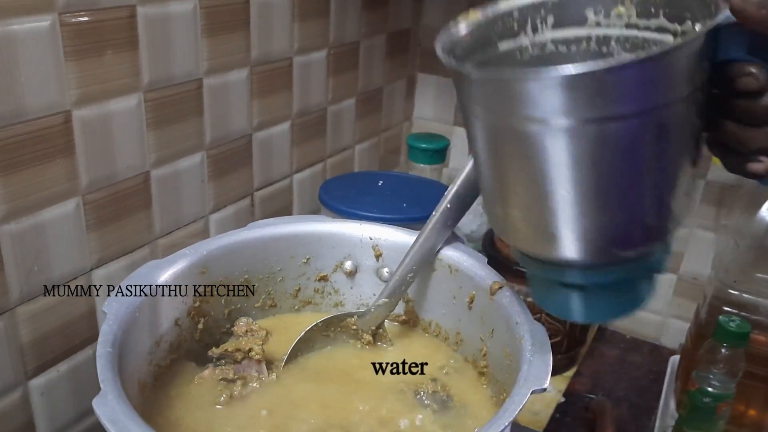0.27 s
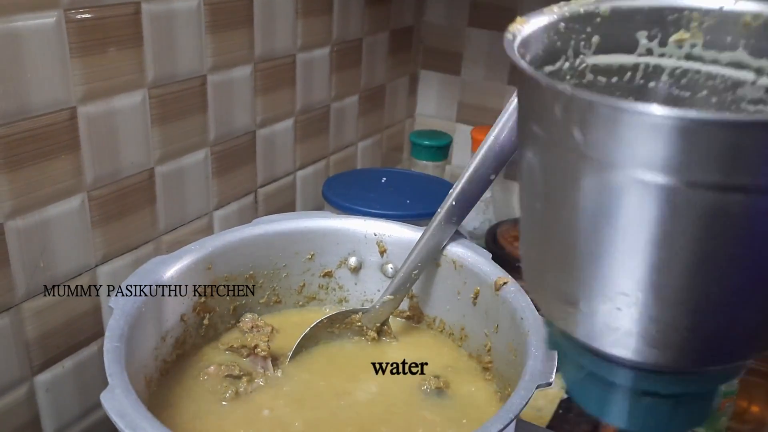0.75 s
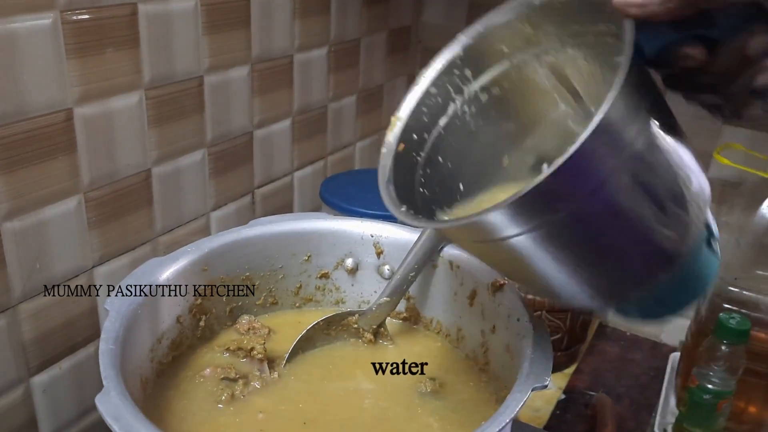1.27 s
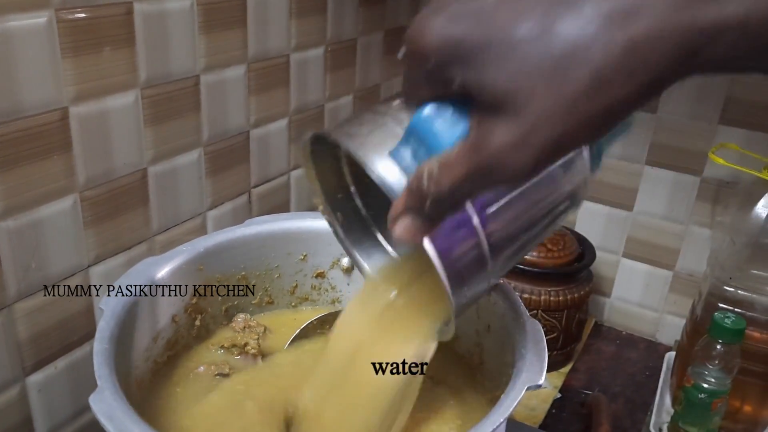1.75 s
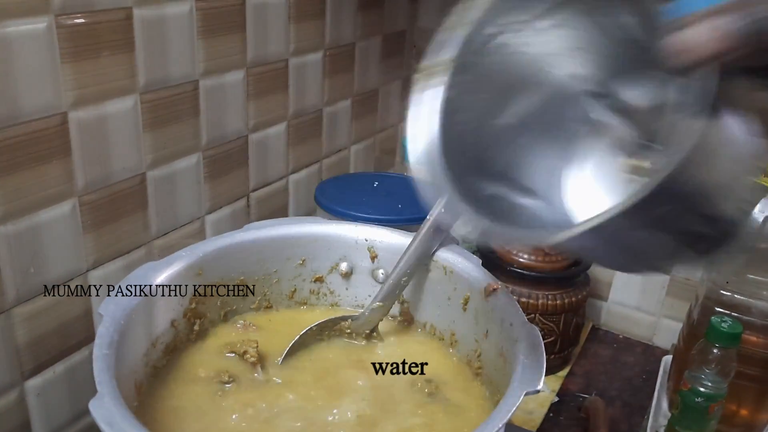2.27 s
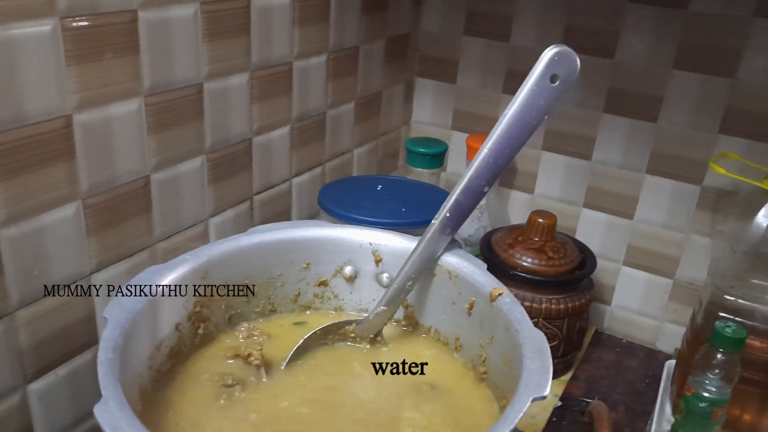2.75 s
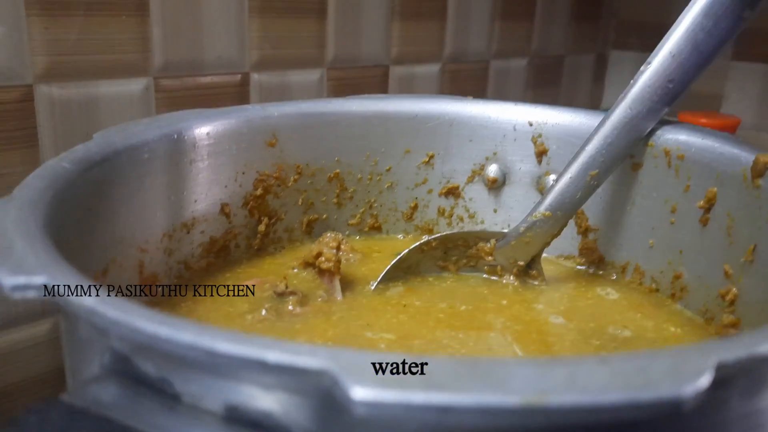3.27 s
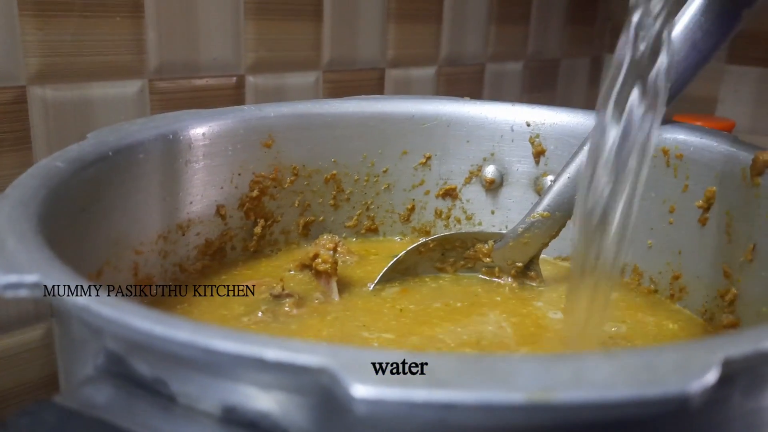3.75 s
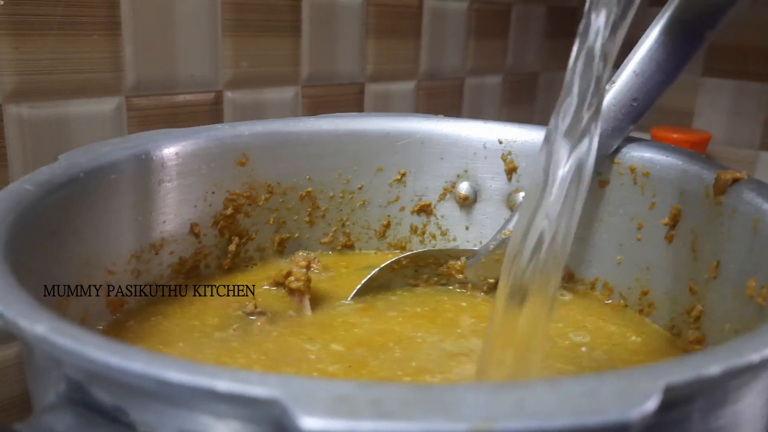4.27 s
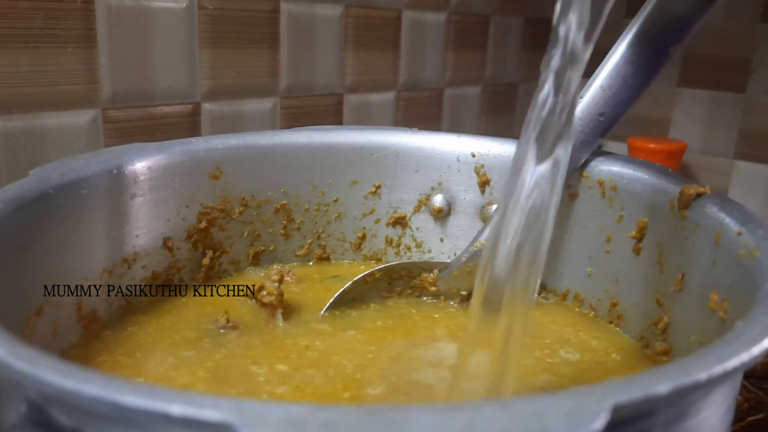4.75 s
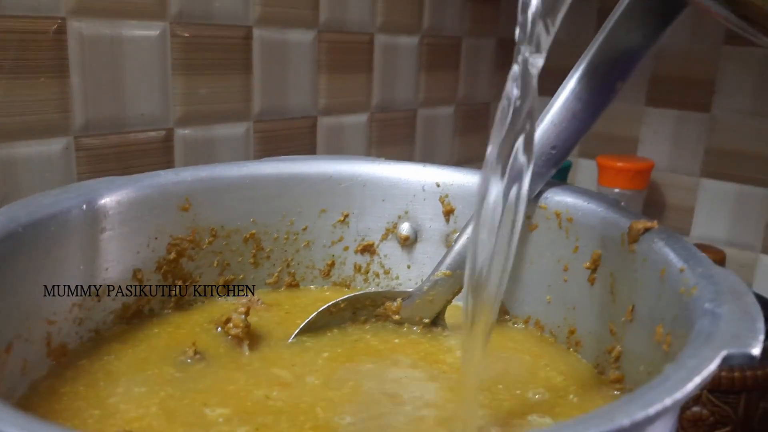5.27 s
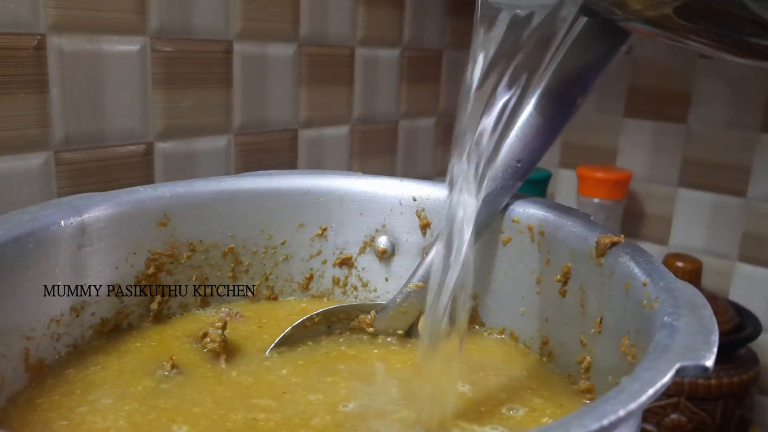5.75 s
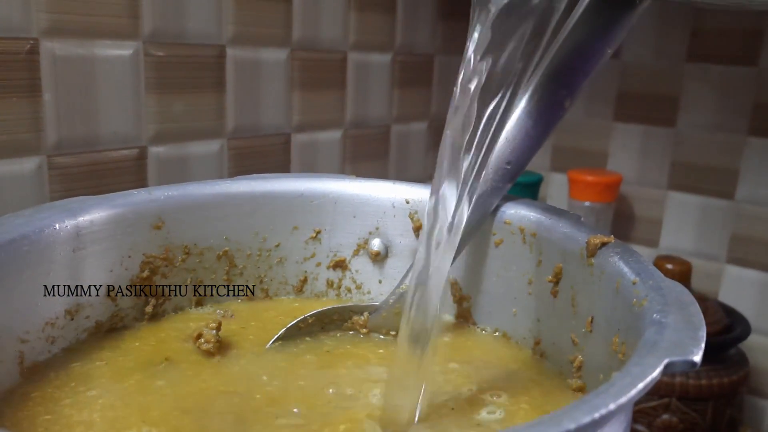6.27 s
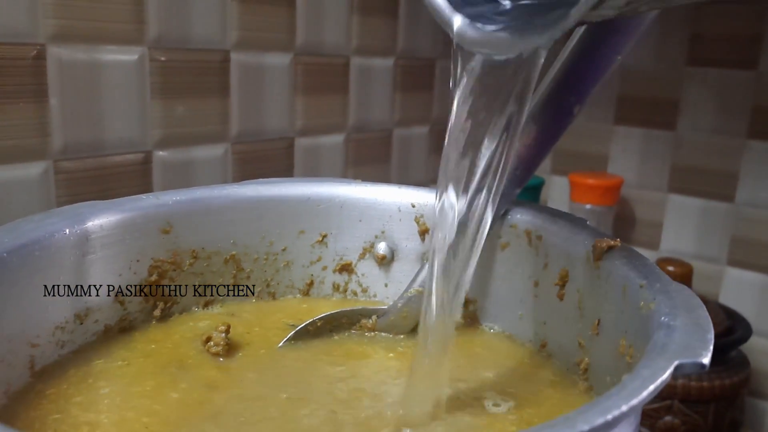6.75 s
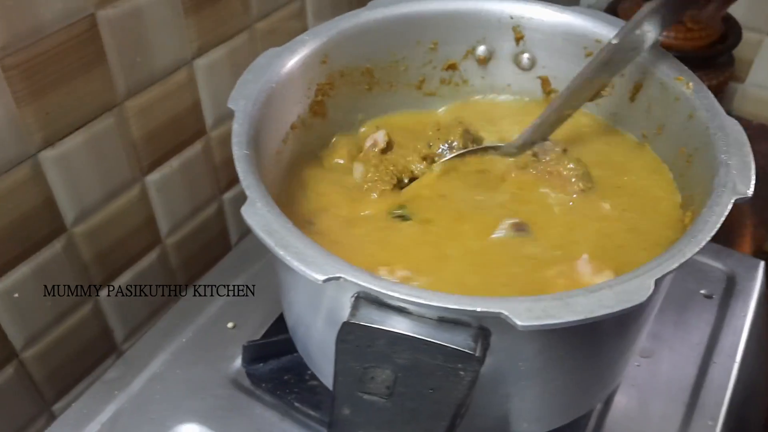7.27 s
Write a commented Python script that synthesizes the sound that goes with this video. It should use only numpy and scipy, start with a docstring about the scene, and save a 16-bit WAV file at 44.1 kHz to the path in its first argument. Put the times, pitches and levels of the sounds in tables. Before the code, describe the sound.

After a short silence, liquid trickles into thick curry in a metal pot, with a brief metallic squeal and a jug clank. A sudden loud splash follows, then near quiet with a faint distant bird. A dull knock starts a steady bubbling stream with plinks, glugs and droplets. Close microphone, small tiled kitchen, soft room hum.

```python
"""After a short silence, water pours into thick curry in a metal pot, over the hum of a tiled kitchen. The pour
is a crowd of random bubbles of three sizes with fine spray; it dies away to drips, and at 4.2 s the sound jumps
at once to a full pour. Single plinks and plops, glugs and ticking droplets stand out: short fading tones and
bursts of noise. A short metal squeal, a clank of the jug and two distant bird notes are built from pure tones.
A low rumble comes and goes, and a brief dull knock sounds just before the full pour breaks in."""
import sys
import numpy as np
from scipy import signal
from scipy.fft import rfft, irfft, next_fast_len
from scipy.io import wavfile
from scipy.ndimage import uniform_filter1d

SR = 44100
rng = np.random.default_rng(int(sys.argv[2]) if len(sys.argv) > 2 else 0)


def persist_wave(psi):
    """Save psi, clipped to +-1, as 16-bit WAV."""
    counts = np.round(np.clip(psi, -1, 1) * 32767).astype(np.int16)
    wavfile.write(sys.argv[1], SR, np.atleast_2d(counts).T)


def volts(x):
    """Linear amplitude factor 10**(x/20) for a level x in dB, scalar or array-like."""
    e = np.asarray(x, float) / 20
    return 10 ** e


N = 330970

# Levels in the tables are those before the final mix and its filters.
# bubble sizes, from large to spray: lowest f/Hz, highest f/Hz, cycles until 20 dB weaker,
# bubbles per second, spread of strength/dB
BUBBLE_SIZES = [(170, 950, 6, 900, 2.2), (950, 3600, 11, 2400, 2.4), (3600, 9000, 13, 5000, 2.4),
                (9000, 15900, 5, 5000, 2.8)]
# tone colour of the pouring water: f/Hz, relative level/dB
WATER_COLOUR = [(76, -47), (130, -9), (187, -5.5), (309, 7.5), (409, 0), (704, -0.5), (1190, -3.5),
                (1370, -6.5), (1670, -2), (3450, -4.5), (3810, -2), (6430, 2), (7560, 7.5), (8870, -8.5),
                (15900, 0)]
# resonances of the air and walls of the pot: f/Hz, width/Hz, relative level/dB
POT_RESONANCES = [(648, 164, -13.5), (1354, 66, -2.5), (2190, 270, -10.5), (2503, 15, -4.5),
                  (3094, 115, -13), (3930, 110, -5.5), (4650, 540, -5.5), (5240, 38, -19), (7610, 60, -14)]
# strength of the falling liquid: t/s, level/dB, lean to small bubbles/dB
POUR_FLOW = [(.69, -51, 0), (.744, -49, -1), (.92, -52, -1.5), (1.0, -56, -2), (1.05, -52, 2),
             (1.19, -53, -5.5), (1.3, -53, -6), (1.32, -46.5, 3), (1.39, -50.5, 1.5), (1.5, -67.5, 2.5),
             (1.8, -67, 6), (1.93, -61.5, -10), (2.13, -75, 1), (2.6, -78.5, 2), (2.81, -74, -5),
             (2.834, -48.5, -16), (2.856, -53.5, -5), (2.871, -36.5, -3.5), (3.0, -39, 0), (3.06, -45.5, 0),
             (3.22, -51, 2), (3.3, -66.5, 7), (3.49, -68.5, 16), (3.7, -71, 7.5), (4.215, -82, 6),
             (4.224, -55.5, -1), (4.28, -53.5, 9), (4.4, -57.5, 0.5), (4.84, -58, -3), (4.98, -53, 1.5),
             (5.15, -54, -3.5), (5.25, -52.5, 2), (5.5, -59, -1.5), (5.8, -65.5, 3), (6.06, -56.5, 5),
             (6.17, -54, -8), (6.27, -56, 2), (6.57, -55, 0.5), (6.96, -60, 1), (7.08, -60.5, -2),
             (7.14, -59, 11), (7.25, -61, 5), (7.41, -48.5, -0.5), (7.5, -70.5, 5)]
# how middle and small bubbles answer the flow: level at an ordinary flow/dB, share of the lean
FLOW_ANSWER = [(-56, -0.71), (-55.5, 0.39)]
# low gurgle of large bubbles: t/s, level/dB
GURGLE_LEVEL = [(.69, -61), (1.05, -62.5), (1.19, -55), (1.39, -60.5), (1.5, -70.5), (1.8, -68),
                (1.93, -61), (2.13, -67), (2.27, -61.5), (2.54, -75), (2.81, -64), (2.87, -49), (2.97, -41),
                (3.06, -52), (3.23, -56), (3.32, -70), (3.4, -62), (3.8, -74), (4.05, -67.5), (4.2, -71.5),
                (4.22, -58.5), (4.4, -61.5), (4.64, -53.5), (4.84, -62.5), (4.98, -50.5), (5.48, -59),
                (5.7, -66.5), (6.05, -64.5), (6.15, -56.5), (6.27, -67), (6.6, -64.5), (6.96, -72.5),
                (7.18, -68.5), (7.4, -66)]
# fine spray: t/s, level/dB
SPRAY_LEVEL = [(.69, -56), (.92, -55.5), (1.0, -61.5), (1.3, -60), (1.32, -53), (1.4, -57), (1.5, -71),
               (1.8, -63), (2.03, -63), (2.13, -85), (2.8, -90), (2.86, -48), (3.0, -52.5), (3.23, -57),
               (3.28, -63), (3.34, -57), (3.66, -60.5), (3.75, -69), (4.215, -90), (4.224, -60),
               (4.84, -62), (4.98, -61.5), (5.25, -56.5), (5.5, -61.5), (5.8, -64.5), (6.17, -57.5),
               (6.27, -54.5), (6.96, -61), (7.41, -56), (7.5, -62)]
# smooth colour of the room hum: f/Hz, relative level/dB
HUM_COLOUR = [(12, -58), (20, -34), (86, -11), (163, -19), (234, -5.5), (356, -7), (695, -7), (894, -43),
              (1320, -20.5), (1750, -29.5), (2070, -14), (3330, -114), (3930, -22.5), (7070, -30.5),
              (15900, -41.5)]
# lumps added to the hum: f/Hz, width/Hz, strength over the smooth colour/dB
HUM_LUMPS = [(57.3, 10, 2), (76.6, 3, 7), (131.6, 10.3, 19), (253, 43, -3), (694, 56, -9),
             (1180, 370, 16.5), (4400, 150, -16), (7600, 470, 16), (10900, 760, 21.5)]
# low rumble: t/s, level/dB
RUMBLE_LEVEL = [(0.7, -69), (2.33, -77.5), (2.86, -75), (2.97, -63.5), (3.12, -63), (3.24, -71.5),
                (4.15, -82.5), (4.22, -71.5), (4.43, -73), (5.07, -73), (5.32, -65), (5.55, -76),
                (6.19, -70), (6.44, -75), (6.91, -74), (7.04, -81), (7.5, -72)]
# how long echoes take to fade by 60 dB: f/Hz, fade time/s
ECHO_FADE = [(300, 0.42), (1300, 0.31), (3500, 0.24), (9000, 0.24)]
# bursting droplets: t/s, strength/dB
TICK_TIMES = [(0.73, -45), (1.046, -46), (1.3094, -43), (1.6277, -53), (2.3119, -51), (2.6706, -58),
              (2.8377, -38), (2.8592, -42), (2.8786, -31), (3.0323, -35), (3.1535, -48), (3.2104, -40),
              (3.2927, -48), (3.4274, -48), (3.5301, -44.5), (4.223, -47), (4.372, -42), (4.3999, -50),
              (4.4399, -50), (4.5177, -41), (4.5371, -51), (4.5641, -48), (4.596, -44), (4.7077, -60),
              (4.7751, -49), (4.8212, -31), (4.9168, -44), (5.0599, -47), (5.0789, -46), (5.107, -44),
              (5.1837, -39), (5.2793, -39.5), (5.3862, -40.5), (5.4185, -38.5), (5.5828, -45),
              (6.2004, -34), (6.2752, -39), (6.5246, -40), (6.592, -50), (6.6414, -48), (6.7127, -46),
              (6.9314, -49), (7.0898, -44), (7.278, -51), (7.3004, -42)]
# single bubbles: t/s, strength/dB, starting f/Hz
SINGLE_BUBBLES = [(1.0131, -40.5, 2160), (1.038, -36, 2250), (1.1248, -40, 7550), (1.1658, -33.5, 4650),
                  (1.326, -37, 3700), (1.349, -34, 7300), (1.3692, -29, 3410), (1.385, -38, 3866),
                  (1.5529, -44, 1860), (1.7598, -46, 2110), (1.773, -42, 2200), (1.81, -25.5, 767),
                  (1.959, -46.5, 7600), (2.0123, -41, 1515), (2.047, -40.5, 7680), (2.071, -52, 4700),
                  (2.1777, -48, 2040), (2.178, -47, 4750), (2.1892, -40.5, 2030), (2.215, -55, 2150),
                  (2.245, -58, 2240), (2.311, -35, 7150), (2.34, -44.5, 657), (2.498, -48, 7530),
                  (2.6138, -45, 1830), (2.626, -44, 1960), (2.6671, -46.5, 2390), (2.669, -49, 1950),
                  (2.667, -56, 7670), (2.719, -43, 2000), (2.722, -54, 2450), (2.7605, -43.5, 1860),
                  (2.764, -51, 2390), (2.7964, -42, 1860), (2.8, -47.5, 2470), (2.8262, -35.5, 1850),
                  (2.8657, -21, 4610), (2.867, -22.5, 7600), (2.8862, -20.5, 4730), (2.8934, -20.5, 4760),
                  (2.935, -33, 837), (2.9797, -32, 2190), (3.0338, -29, 2400), (3.0486, -31, 2510),
                  (3.104, -28.5, 7570), (3.3065, -41.5, 7430), (3.4723, -42.5, 7600), (3.7777, -48, 7060),
                  (4.2263, -42, 4670), (4.371, -44, 4300), (4.401, -33, 6780), (4.5806, -32.5, 4730),
                  (4.7764, -36, 7100), (4.8127, -29.5, 4390), (4.821, -37.5, 694), (4.8232, -33, 7980),
                  (5.0085, -32.5, 7330), (5.0191, -32, 5240), (5.078, -28.5, 788), (5.079, -34.5, 1348),
                  (5.0794, -28.5, 4800), (5.08, -32, 7250), (5.1622, -36, 3865), (5.1887, -31.5, 7250),
                  (5.279, -36, 1944), (5.382, -34.5, 4610), (5.384, -39.5, 343), (5.5666, -39.5, 4800),
                  (5.6584, -34, 7570), (5.767, -39, 7370), (5.7927, -40.5, 4560), (5.9968, -40, 4720),
                  (6.059, -36, 754), (6.0936, -35.5, 5740), (6.1903, -32, 3990), (6.2004, -23, 7610),
                  (6.209, -40, 700), (6.35, -37, 3970), (6.376, -30, 4430), (6.413, -41, 5940),
                  (6.437, -38, 696), (6.5242, -36, 6130), (6.612, -37.5, 1440), (6.6134, -38, 3980),
                  (6.6579, -28, 5050), (6.7233, -37, 4040), (6.93, -39, 5900), (7.0904, -35.5, 7760),
                  (7.2188, -37.5, 4780), (7.2909, -29.5, 4900), (7.3608, -37.5, 7900), (7.386, -37, 813),
                  (7.453, -32, 5220)]
# pitch curve of the metal squeal: t/s, f/Hz, level/dB
SQUEAL_CURVE = [(1.14, 760, -66), (1.17, 781, -54.5), (1.27, 764, -55), (1.35, 781.5, -59),
                (1.39, 780, -87)]
# overtones of the squeal: multiple of the pitch, level against the curve/dB
SQUEAL_OVERTONES = [(1, 1), (2, -2), (3, -4), (4, -3.5), (5, -10), (6, -9), (7, -15), (8, -13), (9, -14),
                    (10, -5.5)]
# runs of quick bubbles, a dribble and some glugs: start t/s, length/s, lowest f/Hz, highest f/Hz,
# middle strength/dB
BUBBLE_RUNS = [(1.151, .23, 712, 960, -48.5), (2.609, 0.24, 1830, 2300, -54), (4.25, .2, 1290, 1410, -54.5),
               (4.759, .22, 1274, 1420, -50.5), (6.057, 0.24, 656, 876, -51), (6.331, .22, 652, 850, -52.5),
               (4.02, .17, 653, 756, -58.5), (6.602, .12, 658, 820, -54.5), (7.258, 0.18, 643, 955, -50.5)]
# blows of the jug against the pot: t/s, strength/dB
CLANK_BLOWS = [(1.793, -34), (1.803, -32.5), (1.829, -28.5), (1.838, -32)]
# ringing tones of the jug: f/Hz, level against the blow/dB, time to fade by 60 dB/s
JUG_TONES = [(1307, -13, 0.037), (1750, -34, 0.018), (1873, -8.5, 0.046), (2150, -4.5, 0.037),
             (2890, -28, 0.2), (2920, -10, 0.12), (2953, 3, 0.098), (3145, -1, 0.03), (3180, -19, 0.038),
             (4100, -18, 0.13), (4290, -15, .06)]
# distant bird, one list a note: t/s, f/Hz, level/dB
BIRD_NOTES = [
    [(3.53, 2910, -72), (3.57, 2670, -64.5), (3.61, 2250, -72), (3.63, 2240, -82)],
    [(3.56, 1910, -73), (3.65, 1870, -71), (3.78, 1876, -71), (3.87, 1746, -80), (3.96, 1880, -82)],
]
# tones of the dull knock: f/Hz, level/dB
KNOCK_TONES = [(260, -41), (650, -45), (1050, -50.5)]

START_S, KNOCK_S, JUMP_S = 0.6615, 4.208, 4.2222  # first sound, knock, sudden jump to full pour
USUAL_FLOW_DB = -55  # an ordinary flow


def evened(x):
    """Scales a sound to an average strength (rms) of 1."""
    return x / np.sqrt(np.mean(x ** 2) + 1e-20)


def read(points, hz):
    """Reads a table between its points, on a log frequency axis."""
    f, value = np.transpose(points)
    return np.interp(np.log(hz + 1), np.log(f + 1), value)


def curve(points):
    """Draws a (time, level) table out to one value per sample."""
    return np.interp(np.arange(N) / SR, *np.transpose(points))


def add(mix, s, sound):
    """Mixes a sound in at time s."""
    part = mix[round(s * SR):][:len(sound)]
    part += sound[:len(part)]


def bumps(peaks, hz):
    """Adds up resonances: each is strongest at its own pitch and falls away on both sides."""
    return sum(volts(db) / np.sqrt(1 + (2 * (hz - f) / width) ** 4) for f, width, db in peaks)


def coloured(x, gain):
    """Filters x: each frequency is made louder or softer by gain(hz)."""
    size = next_fast_len(len(x))
    spectrum = rfft(x, size) * gain(np.fft.rfftfreq(size, 1 / SR))
    return irfft(spectrum, size)[:len(x)]


def hill(hz, centre_hz, width):
    """A smooth rounded hill on a log frequency axis."""
    return np.exp(-(np.log((hz + 1) / centre_hz) / width) ** 2)


def bubble(hz, t60, rise):
    """A fading tone that starts softly and climbs as the bubble nears the surface."""
    t = np.arange(round(t60 * SR) + 8) / SR
    tone = np.sin(2 * np.pi * hz * t * (1 + rise * t / t60))
    return (1 - np.exp(-t * hz / 1.75)) * volts(-60 * t / t60) * tone


def swarm(low_hz, high_hz, cycles, per_s, spread_db, count=28):
    """Random bubbles of one size, coloured by the pot; neighbouring pitches come and go in patches."""
    patches = rng.standard_normal((N // 256 + 1, count))
    patches = uniform_filter1d(patches, size=6, axis=0)  # smooth over time
    patches = evened(uniform_filter1d(patches, size=5, axis=1))  # and over pitch
    kind = rng.integers(0, count, N)
    strength = volts(spread_db * np.minimum(rng.exponential(1, N), 5))
    strength = strength * (rng.random(N) < per_s / SR)  # most samples start no bubble
    strength = strength * volts(3.7 * patches[np.arange(N) // 256, kind])
    out = np.zeros(N)
    for k in range(count):
        hz = low_hz + (high_hz - low_hz) * (k + 0.5) / count
        grain = bubble(hz, 3 * cycles / hz, rise=0.069)
        out += signal.oaconvolve(strength * (kind == k), grain / np.linalg.norm(grain))[:N]

    def pot_gain(hz):
        return volts(read(WATER_COLOUR, hz)) * (0.5 + 1.19 * bumps(POT_RESONANCES, hz))
    return evened(coloured(out, pot_gain))


def stream():
    """Middle and small bubbles share the one flow; gurgle and spray have their own levels."""
    s, level_db, lean_db = np.transpose(POUR_FLOW)
    t = np.arange(N) / SR
    middle_db, small_db = [np.interp(t, s, db + level_db - USUAL_FLOW_DB + share * lean_db)
                           for db, share in FLOW_ANSWER]
    levels_db = [curve(GURGLE_LEVEL), middle_db, small_db, curve(SPRAY_LEVEL)]
    return sum(volts(db) * swarm(*size) for db, size in zip(levels_db, BUBBLE_SIZES))


def hum():
    """Steady room noise with a few lumps in its colour and slowly drifting patches."""
    frames = N // 256 + 5
    real, imaginary, patches = rng.standard_normal((frames, 513, 3)).T
    patches = uniform_filter1d(patches, 10, 0)  # smooth over pitch
    patches = evened(uniform_filter1d(patches, 12, 1))  # and over time
    spectra = (real + 1j * imaginary) * volts(1.27 * patches)
    noise = signal.istft(spectra, nperseg=1024, noverlap=768)[1][:N]

    def room_gain(hz):
        return volts(read(HUM_COLOUR, hz)) * (1 + bumps(HUM_LUMPS, hz))
    return volts(-65.5) * evened(coloured(noise, room_gain))


def rumble():
    """Low noise, strongest near 80 Hz, that swells and sinks."""
    low = coloured(rng.standard_normal(N), lambda hz: (hz / 80) ** 3 / (1 + (hz / 90) ** 7))
    return volts(curve(RUMBLE_LEVEL)) * evened(low)


def kitchen(x):
    """Sparse echoes of random sign from tiles and pot, each band dying at its own speed."""
    taps = np.zeros(SR)
    at = np.arange(400, SR - 20, 20)  # the nearest tiles answer after 9 ms
    taps[at + rng.integers(0, 20, len(at))] = rng.choice([-1., 1.], len(at))
    hz, t, z = signal.stft(taps, SR, nperseg=256)
    fade = volts(-60 * t / read(ECHO_FADE, hz)[:, None])
    tail = signal.istft(z * fade, SR, nperseg=256)[1]
    return signal.fftconvolve(x, tail / np.linalg.norm(tail))[:N]


def ticks():
    """Each bursting droplet is a sharp bright crack of noise with a breath of hiss behind it."""
    crack_s, hiss_s, hiss_share, low_hz = 0.0017, 0.025, 0.21, 5980  # fades, share, low limit
    out, t = np.zeros(N), np.arange(2048) / SR
    for (s, db), noise in zip(TICK_TIMES, rng.standard_normal((len(TICK_TIMES), 2048))):
        fade = np.exp(-t / crack_s) + hiss_share * np.exp(-t / hiss_s)
        add(out, s, volts(db) * noise * fade)
    return coloured(out, lambda hz: 1 / np.sqrt(1 + (low_hz / (hz + 1)) ** 4))


def plops():
    """Single bubbles ring amid froth of nearby pitches; all but those of the runs may splash."""
    froth_share, splash_share = 0.59, 0.3
    gentle_db, firm_db = -46, -38  # gentle bubbles do not splash, firm ones do fully
    tones, splash, t = np.zeros(N), np.zeros(N), np.arange(1024) / SR
    rows = [(*row, 1) for row in SINGLE_BUBBLES + drops()]
    rows += [(*row, 0) for row in dribble()]
    noises = rng.standard_normal((len(rows), 2, 1024))
    for (s, db, hz, splashes), (froth_noise, splash_noise) in zip(rows, noises):
        t60 = 0.034 * (hz / 1000) ** -0.15  # s; larger, lower bubbles ring longer
        ring = bubble(hz, t60, rise=0.022)
        froth = evened(coloured(froth_noise, lambda f: hill(f, hz, 0.13)))
        froth = froth * (1 - np.exp(-t / 0.0013)) * np.exp(-t / 0.0044)
        wide = splashes * splash_share * np.clip((db - gentle_db) / (firm_db - gentle_db), 0, 1)
        add(tones, s, volts(db) * (1 - froth_share) * ring / abs(ring).max())
        add(tones, s, volts(db) * froth_share * froth)
        add(splash, s, volts(db) * wide * splash_noise * np.exp(-t / 0.0018))
    return tones + coloured(splash, lambda hz: volts(read(WATER_COLOUR, hz)))


def wavering_tone(rows, overtones, waver):
    """A shaky tone with overtones along a pitch curve; gives its start in s and its sound."""
    s, hz, db = np.transpose(rows)
    t = np.arange(s[0], s[-1], 1 / SR)
    shake = evened(uniform_filter1d(rng.standard_normal(len(t)), 200))
    turns = np.cumsum(np.interp(t, s, hz) * (1 + waver * shake)) / SR
    wave = sum(volts(lift) * np.sin(2 * np.pi * k * turns) for k, lift in overtones)
    level = np.sqrt(2) * volts(np.interp(t, s, db))
    return s[0], level * wave * signal.windows.tukey(len(t), 0.1)


def squeal():
    """A short metal squeal: one gliding, shaky pitch with ten harmonics."""
    out = np.zeros(N)
    add(out, *wavering_tone(SQUEAL_CURVE, SQUEAL_OVERTONES, waver=0.011))
    return out


def dribble(count=20):
    """Chance bubbles in quick succession; the pitch range opens upward as a run gets going."""
    rows = []
    chances = rng.random((len(BUBBLE_RUNS), 3, count))
    for (start, length, low_hz, high_hz, db), (when, pitch, size) in zip(BUBBLE_RUNS, chances):
        along = (np.arange(count) + when) / count
        hz = low_hz + (high_hz - low_hz) * pitch ** 2 * np.minimum(3 * along, 1)
        rows += zip(start + length * along, db + 6 * (size - 0.5), hz)
    return rows


def clanks():
    """Each blow rings the steel jug, every tone with its own chance share, over a short rattle."""
    out, t = np.zeros(N), np.arange(SR // 4) / SR
    chances = rng.standard_normal((len(CLANK_BLOWS), len(JUG_TONES) + len(t)))
    for (s, db), chance in zip(CLANK_BLOWS, chances):
        shares_db = 2.2 * chance[:len(JUG_TONES)]
        ring = sum(volts(lift + share - 60 * t / t60) * np.sin(2 * np.pi * hz * t)
                   for (hz, lift, t60), share in zip(JUG_TONES, shares_db))
        rattle = evened(coloured(chance[len(JUG_TONES):], lambda hz: hill(hz, 3000, 0.92)))
        rattle = 0.37 * rattle * np.exp(-t / 0.0055)
        add(out, s, volts(db) * (1 - np.exp(-t / 0.00035)) * (ring + rattle))
    return out


def birds():
    """Two distant bird notes: shaky pure tones without overtones."""
    out = np.zeros(N)
    for note in BIRD_NOTES:
        add(out, *wavering_tone(note, [(1, 0)], waver=0.016))
    return out


def knock():
    """A brief dull knock of three steady tones that ends as the full pour breaks in."""
    out, t = np.zeros(N), np.arange(round((JUMP_S - KNOCK_S) * SR)) / SR
    tones = sum(volts(db) * np.sin(2 * np.pi * hz * t) for hz, db in KNOCK_TONES)
    add(out, KNOCK_S, tones * signal.windows.tukey(len(t), 0.4))
    return out


def drops(count=110):
    """Small chance drops in the full pour after 4.2 s, near high pot resonances; they follow the flow."""
    when, which, pitch, size = rng.random((count, 4)).T
    s = JUMP_S + (N / SR - JUMP_S) * when
    flow_db = np.interp(s, *np.transpose(POUR_FLOW)[:2]) - USUAL_FLOW_DB
    high = np.array([hz for hz, width, db in POT_RESONANCES if hz > 3500])
    hz = high[(which * len(high)).astype(int)] * (1 + 0.1 * (pitch - 0.5))
    return list(zip(s, -45 + flow_db - 2 * np.log(size + 0.1), hz))  # strength in dB


def scene():
    """Water and metal are near and echo; the birds arrive mostly as echo."""
    flow, far_birds = stream(), birds()
    single = plops() + ticks() + clanks() + squeal()
    echoes = kitchen(volts(-9.5) * flow + volts(-2.5) * single + far_birds)
    direct = volts(-1.0) * flow + single + volts(-5.0) * far_birds
    return (direct + echoes + hum() + rumble() + knock())[None]


def top_cut(x):
    """Nothing passes above the cut-off."""
    return signal.sosfilt(signal.butter(12, 16500, fs=SR, output="sos"), x)


def record(dry):
    """Trims the deepest lows and highest highs, and keeps silence until the sound starts."""
    high_pass = signal.butter(2, 30, "highpass", fs=SR, output="sos")  # Hz
    trimmed = signal.sosfilt(high_pass, dry)
    low_pass = signal.firwin(255, 15900, fs=SR)  # Hz
    limited = signal.oaconvolve(trimmed, low_pass[None], "same")
    finished = limited * (np.arange(N) >= START_S * SR)
    return top_cut(finished)


dry = scene()
out = record(dry)
persist_wave(out)
```